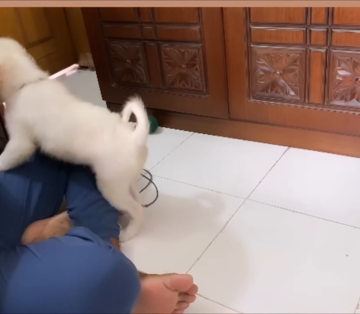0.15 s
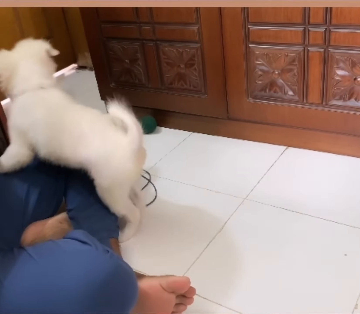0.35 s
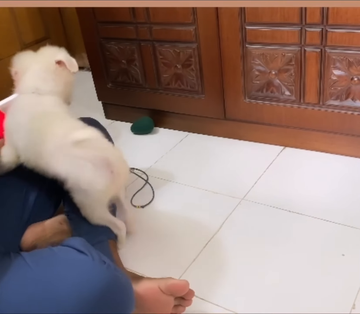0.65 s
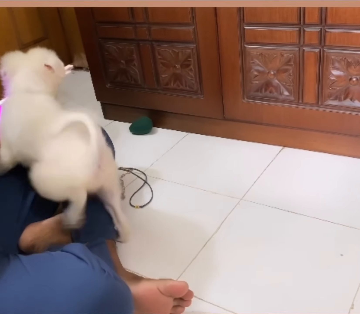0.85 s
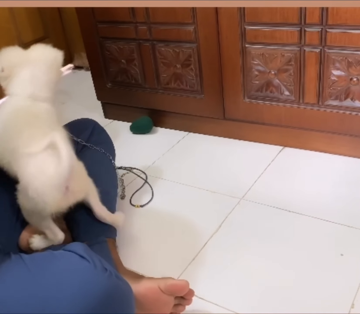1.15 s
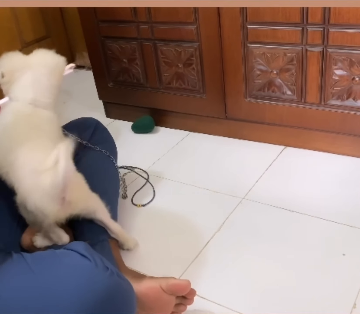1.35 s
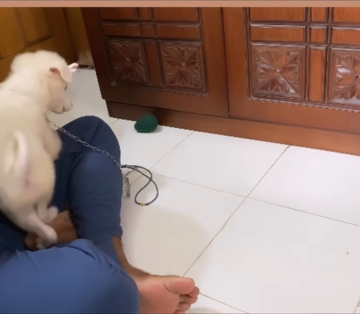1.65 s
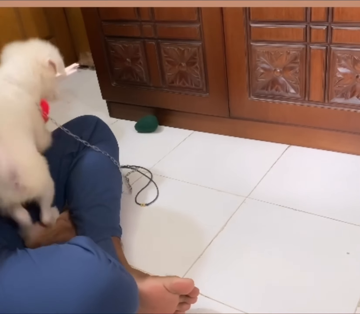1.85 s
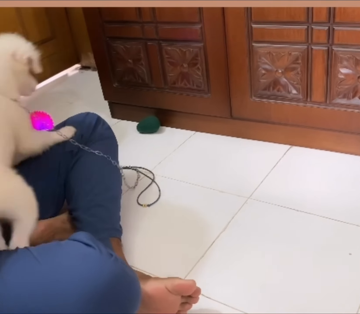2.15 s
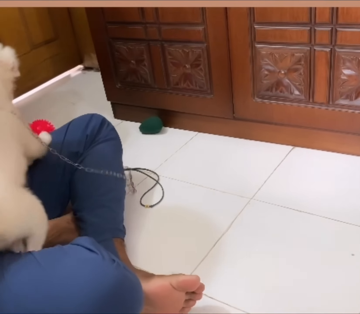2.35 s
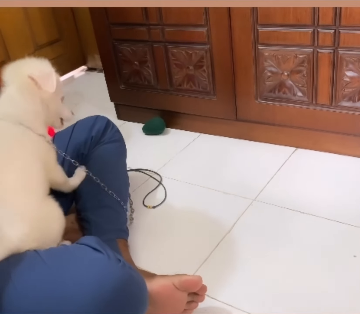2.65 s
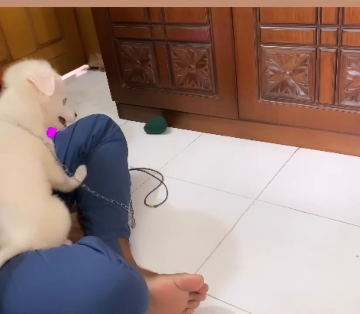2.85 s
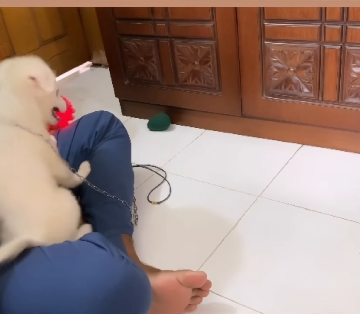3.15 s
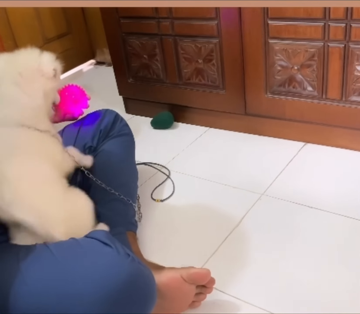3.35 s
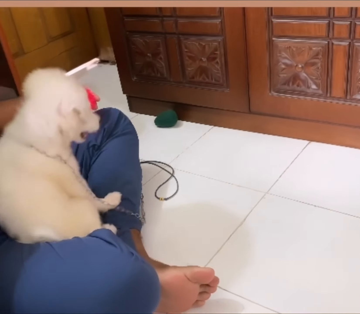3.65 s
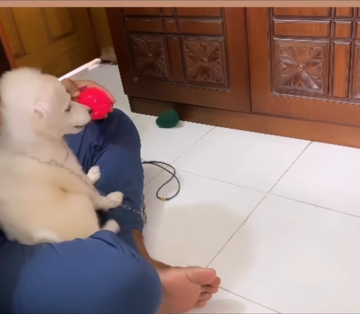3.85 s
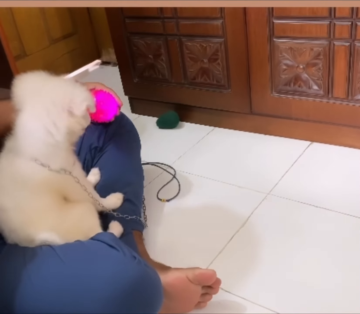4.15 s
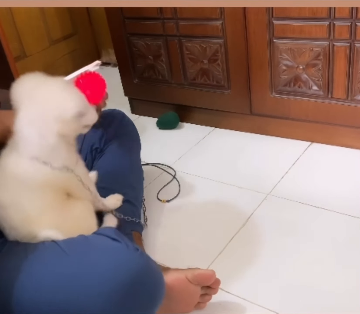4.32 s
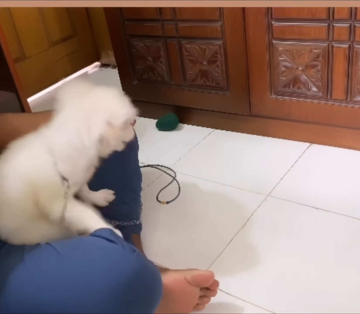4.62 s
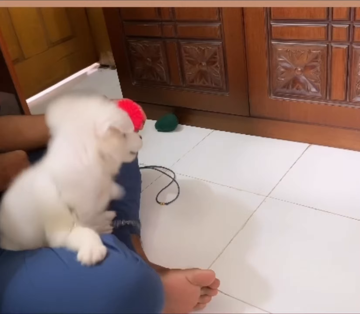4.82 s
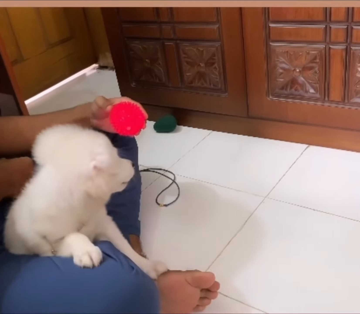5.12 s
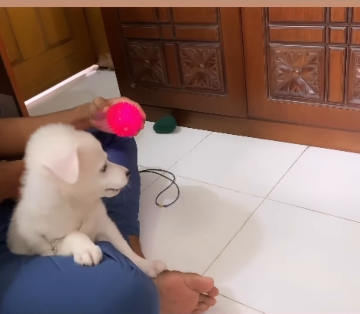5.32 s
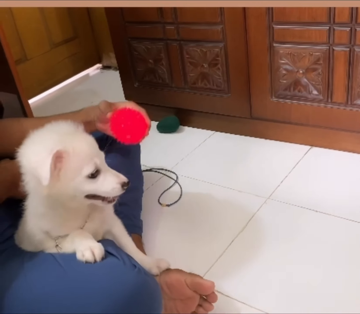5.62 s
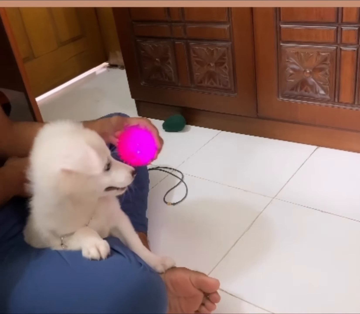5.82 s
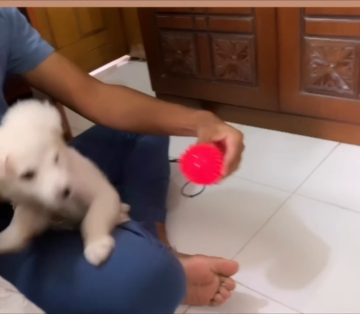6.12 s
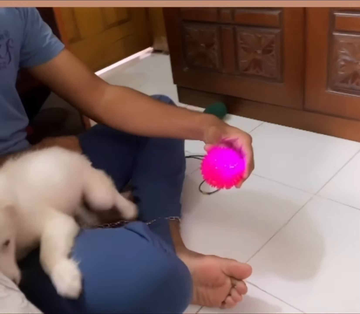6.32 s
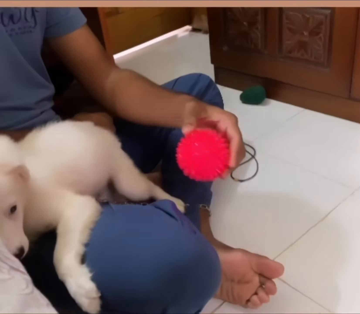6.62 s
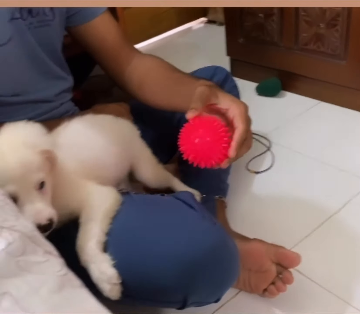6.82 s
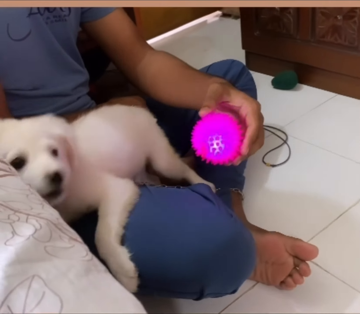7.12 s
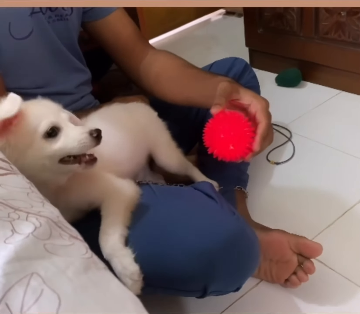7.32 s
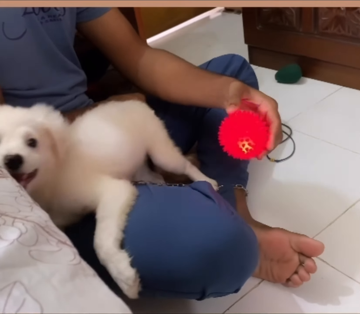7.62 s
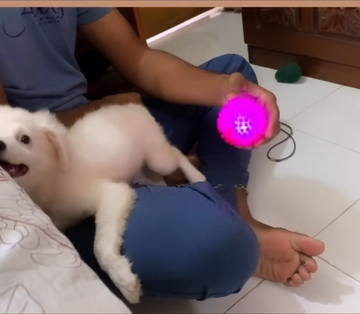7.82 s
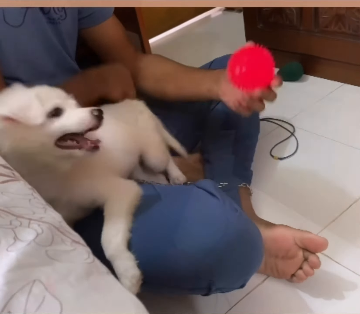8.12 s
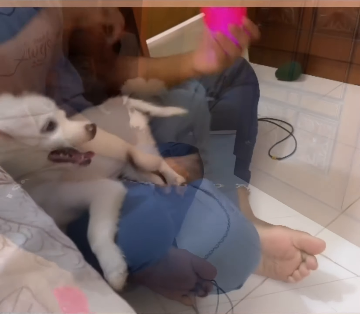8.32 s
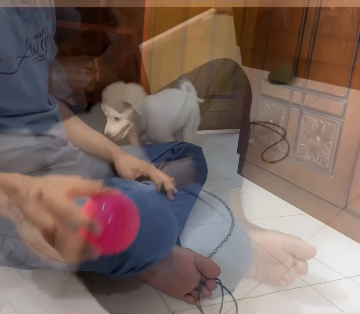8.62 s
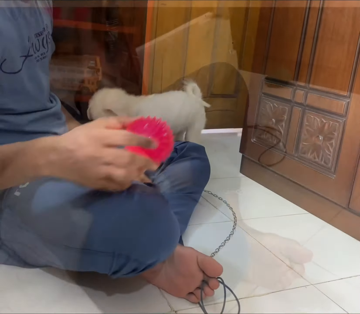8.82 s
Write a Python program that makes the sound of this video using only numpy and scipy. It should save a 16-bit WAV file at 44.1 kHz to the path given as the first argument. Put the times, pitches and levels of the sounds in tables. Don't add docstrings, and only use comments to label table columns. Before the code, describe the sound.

A dog toy with a reed squeaker is pressed six times close to a phone, each press a short bright high peep followed almost at once by a lower, breathy intake squeak. Between them is steady low fan air and soft wind rumble, with a stronger cluster of thumps before the third squeak. Hard tiles add a short bright tail; fabric brushes very faintly at the end.

```python
import sys
import numpy as np
from scipy import signal
from scipy.fft import rfft, irfft, next_fast_len
from scipy.io import wavfile
from scipy.ndimage import uniform_filter1d, minimum_filter1d, map_coordinates

SR = 44100
rng = np.random.default_rng(int(sys.argv[2]) if len(sys.argv) > 2 else 0)


def persist_wave(psi):
    counts = np.round(np.clip(psi, -1, 1) * 32767).astype(np.int16)
    wavfile.write(sys.argv[1], SR, np.atleast_2d(counts).T)


def invert_db(level):
    return 10 ** (np.asarray(level, dtype=float) / 20)


N = 395577
SPLIT_HZ, TOP_HZ = 6050, 15950


def unit(x):
    return x / np.sqrt(np.mean(x ** 2) + 1e-20)


def along(points, hz):
    f, v = np.transpose([(points[0][0] / 4, -120), *points, (points[-1][0] * 4, -120)])
    return np.interp(np.log(hz + 1), np.log(f + 1), v)


def curves(rows, t):
    s, *cols = np.transpose(rows)
    return [np.interp(t, s, c) for c in cols]


def wobble(rate, size=N):
    knots = rng.standard_normal(int(size * rate / SR) + 4)
    return map_coordinates(knots, [np.arange(size) * rate / SR])


def eddies(rate, count, size):
    knots = rng.standard_normal((count, int(size * rate / SR) + 2))
    return np.array([np.interp(np.arange(size) * rate / SR, np.arange(len(row)), row) for row in knots])


def noise(gain):
    m = next_fast_len(N)
    spectrum = rfft(rng.standard_normal(m)) * gain(np.fft.rfftfreq(m, 1 / SR))
    return unit(irfft(spectrum, m)[:N])


def causal(points, size=1024):
    gain = invert_db(along(points, np.fft.rfftfreq(size, 1 / SR)))
    cepstrum = irfft(np.log(gain + 1e-5))
    cepstrum[1:size // 2] *= 2
    cepstrum[size // 2 + 1:] = 0
    return irfft(np.exp(rfft(cepstrum)))[:size // 2]


# start_s [s], level_db [dB]
FAN_LEVEL = [(0, -45), (3, -42.5), (7.6, -42), (8.97, -40)]
# pitch_hz [Hz], level_db [dB per Hz]
FAN_AIR = [(71, -43.5), (120, -9.5), (150, -2.5), (184, -4), (341, -6.5), (370, -10.5), (445, -9),
           (569, -19), (670, -15), (1160, -19), (1750, -26), (3900, -34.5), (5750, -49), (11100, -55.5),
           (16000, -68.5)]
# pitch_hz [Hz], width_hz [Hz], level_db [dB]
FAN_HUM = [(154.8, 8.7, -45), (250, 2.1, -42.5), (346.4, 6.5, -49), (433, 5.3, -55.5), (511, 2.7, -51.5)]


def fan():
    t = np.arange(N) / SR
    db, = curves(FAN_LEVEL, t)
    squeak_ends = np.array([-9] + [r[-1][0] for r in RELEASE])
    since_squeak = t - squeak_ends[np.searchsorted(squeak_ends, t) - 1]
    db = db - 3 * np.exp(-since_squeak / 1.0)
    body = noise(lambda f: invert_db(along(FAN_AIR, f)) * (f < SPLIT_HZ))
    treble = noise(lambda f: invert_db(along(FAN_AIR, f)) * (f >= SPLIT_HZ))
    hum = noise(lambda f: sum(invert_db(level) / (1 + (2 * (f - c) / w) ** 2) for c, w, level in FAN_HUM))
    return invert_db(db + 11 + .5 * wobble(6)) * body + invert_db(db - 23) * treble + invert_db(-40) * hum


# start_s [s], level_db [dB]
GUSTS = [(0.0, -36.5), (1.07, -38.5), (1.75, -43), (2.25, -35), (2.47, -36), (3.07, -34), (3.54, -22.5),
         (3.82, -29), (4.22, -29), (4.7, -39), (5.74, -35), (6.12, -36.5), (7.24, -34.5), (7.77, -36.5),
         (8.54, -31), (8.97, -33)]
# pitch_hz [Hz], level_db [dB per Hz]
RUMBLE = [(15, -28.5), (30, -4.5), (55, -1.5), (90, -2.5), (130, -26)]
# pitch_hz [Hz], level_db [dB per Hz]
FLUTTER = [(60, -30), (100, -5.5), (160, -8), (300, -13.5), (600, -42)]


def buffet():
    gust_db, = curves(GUSTS, np.arange(N) / SR)
    flutter_db = -32 + 0.94 * (gust_db + 34)
    swells = 1.3 * wobble(9)
    lumps = invert_db(1.4 * wobble(25))
    rumble_noise = noise(lambda f: invert_db(along(RUMBLE, f)))
    flutter_noise = noise(lambda f: invert_db(along(FLUTTER, f)))
    rumble = unit(invert_db(swells + 2.1 * wobble(10)) * lumps * rumble_noise)
    flutter = unit(invert_db(swells + 1.7 * wobble(13)) * lumps ** 1.774 * flutter_noise)
    return invert_db(gust_db + 1.7) * rumble + invert_db(flutter_db - 3) * flutter


# start_s [s], level_db [peak dB], pitch_hz [Hz]
THUMPS = [(0.383, -10, 108.5), (3.159, -14, 79.4), (3.387, -9.5, 99.3), (3.468, -15, 129), (3.518, -13, 74),
          (3.601, -8.5, 97.2), (3.638, -9.5, 129), (3.743, -7.5, 143), (4.13, -11.5, 75), (4.154, -9, 140),
          (4.363, -17, 98), (4.989, -13.5, 112), (5.586, -13.5, 76.1), (6.099, -14, 70.3),
          (8.31, -13.5, 60.4), (8.406, -13.5, 99), (8.418, -24.5, 500), (8.944, -12.5, 59),
          (0.722, -21, 68), (2.664, -21, 56), (2.784, -15, 75), (2.925, -17.5, 59.6), (4.188, -13, 54.5),
          (6.24, -25, 70), (6.57, -16, 77.1), (8.52, -16.5, 80), (8.598, -17, 51), (3.737, -16, 330),
          (4.152, -19, 320), (3.465, -20, 330)]


def thumps():
    out, t = np.zeros(N + SR), np.arange(-2000, 2000) / SR
    for s, db, hz in THUMPS:
        slowing = 1 - 0.35 * np.clip(hz * t, -2, 2)
        bump = np.exp(-(np.where(t < 0, 1.5, 1.1) * hz * t) ** 2)
        first = round(s * SR) - len(t) // 2
        out[first:][:len(t)] += invert_db(db - 1.5) * np.cos(2 * np.pi * hz * t * slowing) * bump
    return out[:N]


BLOWN = dict(full_db=-13.5, knee_hz=1073, lost_db=8, gained_db=0.64, ring_db=1.5, ripple_db=1.5, tilt_db=0.4)
DRAWN = dict(full_db=-15, knee_hz=788.5, lost_db=13, gained_db=-0.5, ring_db=-1.5, ripple_db=3, tilt_db=1)
RING_HZ = 7576


def swing(t, hz, settle_db, full_db, knee_hz, lost_db, gained_db, ring_db, ripple_db, tilt_db):
    over = (hz - knee_hz) / 100
    db = full_db + lost_db * np.minimum(over, 0) * np.clip(t / .02, 0, 1)
    db = db + gained_db * np.maximum(over, 0)
    db = db + settle_db * np.exp(-((t - 0.01) / 0.0049) ** 2)
    db = db + .8 * wobble(40, size=len(t))
    return db, ring_db + ripple_db * np.cos(2 * np.pi * RING_HZ / hz) + tilt_db * over


STALL, STALL_S = .025, .005


def squeak(rows, law, settle_db, grip_db, pipe, sign, jitter, rough, fade_s, leak_db, lead_db, lag_s,
           slow, blur, shine_db):
    onset_s, stop_s = rows[0][0], rows[-1][0]
    start = round((onset_s - .003) * SR)
    t = np.arange(start, round((stop_s + .015) * SR)) / SR
    hz = uniform_filter1d(curves(rows, t)[0], size=300, mode="nearest")
    hz = hz * (1 - STALL * np.exp(np.minimum(t - stop_s, .003) / STALL_S))
    db, ring_db = swing(t - onset_s, hz, settle_db, **law)

    early = np.clip((onset_s - t) / .003, 0, 1)
    from_onset = np.abs(t - onset_s)
    hz = hz * (1 - slow * early - 0.045 * np.exp(-from_onset / 0.00053))
    db = db + grip_db + lead_db * early + 3 * np.exp(-from_onset / 0.0013)
    ring_db = ring_db - 20 * (early > 0)
    turns = np.cumsum(hz * (1 + jitter * wobble(250, size=len(t)))) / SR
    phase = 2 * np.pi * (turns - turns[np.argmin(early)] - .2)

    k = np.arange(1, 25)[:, None]
    overtone_hz = k * hz
    heard = overtone_hz < TOP_HZ
    upper = overtone_hz > SPLIT_HZ
    power = invert_db(along(pipe, overtone_hz)) ** 2 / 2 * heard
    low = invert_db(db) / np.sqrt((power * ~upper).sum(0))
    high = invert_db(db + ring_db) / np.sqrt((power * upper).sum(0))
    blend = np.clip((overtone_hz - SPLIT_HZ) / 800 + .5, 0, 1)
    level = low + blend * (high - low)

    lag = 2 * np.pi * lag_s * np.minimum(overtone_hz, SPLIT_HZ)
    swirl = 1.1 * eddies(120, count=len(k), size=len(t)) * (overtone_hz / 12000) ** 3
    patches = eddies(35, count=len(k), size=len(t))
    shine = invert_db((shine_db + 7.3 * patches) * np.clip((overtone_hz - 10000) / 1500, 0, 1))
    pulses = (np.cos(k * phase - lag + blur * swirl) * heard * shine * level).sum(0)
    pulses *= 1 + rough * wobble(900, size=len(t))
    pulses *= np.exp(-np.clip(t - stop_s, 0, 1) / fade_s)
    tone = signal.fftconvolve(sign * pulses, causal(pipe))[:len(t)]
    return start, tone, invert_db(db + leak_db) * (t < stop_s)


# start_s [s], pitch_hz [Hz]
SQUEEZE = [
    [(0.634, 1048), (0.66, 1076), (0.706, 1279), (0.718, 1293), (0.738, 1224), (0.772, 1010)],
    [(2.464, 1086), (2.488, 1195), (2.502, 1206), (2.528, 1127), (2.546, 1034), (2.554, 990)],
    [(3.774, 1080), (3.788, 1151), (3.812, 1191), (3.84, 1182), (3.858, 1128), (3.868, 1044), (3.876, 1015)],
    [(4.673, 1055), (4.691, 1145), (4.707, 1154), (4.729, 1127), (4.765, 1032), (4.775, 987)],
    [(6.102, 1068), (6.122, 1141), (6.176, 1170), (6.19, 1142), (6.219, 1004)],
    [(7.672, 1064), (7.692, 1146), (7.712, 1140), (7.724, 1128), (7.753, 995)],
]
# start_s [s], pitch_hz [Hz]
RELEASE = [
    [(0.798, 822), (0.814, 902), (0.854, 966), (0.864, 936), (0.892, 854), (0.9, 811), (0.933, 729)],
    [(2.587, 799), (2.601, 866), (2.613, 858), (2.689, 722)],
    [(3.907, 820), (3.925, 910), (3.939, 896), (3.957, 857), (3.987, 776.4), (4.009, 746), (4.018, 700)],
    [(4.809, 793), (4.825, 808), (4.843, 890), (4.851, 891), (4.911, 698)],
    [(6.256, 804), (6.272, 838), (6.29, 927), (6.302, 930), (6.324, 870), (6.338, 800), (6.367, 713)],
    [(7.798, 814), (7.82, 835), (7.874, 712)],
]
# squeeze_db [dB], release_db [dB]
GRIP = [(-1.5, -1.2), (-0.5, -1), (-0.3, -1), (0.4, -1.15), (0.9, 0), (1, 0.3)]
# squeeze_db [dB], release_db [dB]
SHINE = [(-7, -3.5), (-1, -2), (2.5, -1.5), (0.5, 4), (-0.5, 3), (-3, 0)]
# pitch_hz [Hz], level_db [dB]
PIPE_OUT = [(500, -10.5), (1100, -18.5), (2300, -20.5), (3600, -18), (4150, -21), (4700, -14),
            (5300, -20.5), (6100, -30), (7000, -13), (7600, -14), (9200, -18.5), (10500, -35), (12800, -46),
            (16000, -53.5)]
# pitch_hz [Hz], level_db [dB]
PIPE_IN = [(400, -21), (830, -14.5), (1700, -21.5), (3200, -22), (4600, -26), (5300, -29), (6050, -53.5),
           (6700, -27), (7500, -16.5), (8600, -15), (10000, -26), (10900, -34.5), (11900, -43.5),
           (16000, -49)]
# pitch_hz [Hz], level_db [dB per Hz]
LEAK = [(2500, -29.5), (4700, -22), (6040, -22), (7200, -1), (7940, 3), (10800, -22.5), (11500, -24),
        (16000, -40)]


def ball():
    tone, flow = np.zeros(N), np.zeros(N)
    for blown, drawn, (out_db, in_db), (push_db, pull_db) in zip(SQUEEZE, RELEASE, SHINE, GRIP):
        squeezed = squeak(blown, BLOWN, settle_db=-4, grip_db=push_db, pipe=PIPE_OUT, sign=-0.52,
                          jitter=.0003, rough=.004, fade_s=.0018, leak_db=-25, lead_db=-8,
                          lag_s=.00027, slow=.45, blur=.6, shine_db=out_db)
        released = squeak(drawn, DRAWN, settle_db=0.3, grip_db=pull_db, pipe=PIPE_IN, sign=0.68,
                          jitter=.0022, rough=.043, fade_s=.0039, leak_db=-19.5, lead_db=-17.5,
                          lag_s=.00018, slow=.046, blur=1.4, shine_db=in_db)
        for start, sound, leak in (squeezed, released):
            tone[start:start + len(sound)] += sound
            flow[start:start + len(sound)] += leak
        before = np.arange(3000, 0, -1)
        build_db = -46 - 300 * before / SR - 1500 * np.maximum(before / SR - .032, 0)
        flow[round(blown[0][0] * SR) - before] += invert_db(build_db)
    return tone + flow * invert_db(1.8 * wobble(70)) * noise(lambda f: invert_db(along(LEAK, f)))


# delay_s [s], level_db [dB]
ECHOES = [(.0004, -16), (.0013, -21.5), (.0031, -15), (.0052, -22.5), (.0083, -24), (0.0115, -19.5),
          (0.021, -20.5)]


def nearby(x):
    copies = sum(invert_db(db) * np.pad(x, (round(s * SR), 0))[:N] for s, db in ECHOES)
    return x + signal.lfilter(*signal.butter(1, 5000, "high", fs=SR), copies)


# pitch_hz [Hz], t60_s [s]
TILES = [(500, 0.71), (3000, 0.3), (8000, 0.33), (10400, 0.24), (12000, 0.16), (16000, 0.1)]


def tiles(x):
    hz, t, z = signal.stft(rng.standard_normal(SR // 2), SR, nperseg=256)
    t60 = np.interp(hz, *np.transpose(TILES))
    tail = signal.istft(z * invert_db(-60 * t / t60[:, None]), SR, nperseg=256)[1]
    return signal.fftconvolve(np.pad(x, (200, 0)), tail / np.linalg.norm(tail))[:N]


# [s per 10 dB of
RUSTLE = [
    (8.24, -78, 1),
    (8.47, -81, -5.5),
    (8.66, -71, -4.5),
    (8.89, -74.5, .08),
]
# pitch_hz [Hz], level_db [dB per Hz]
CLOTH = [(3000, -11), (6000, -0.5), (10000, -2), (15000, -3.5), (16000, 1.5)]


def cloth():
    t = np.arange(N) / SR
    strokes = 0
    for s, db, fade_s in RUSTLE:
        drop = np.maximum((s - t) / .015, (t - s) / fade_s)
        strokes = strokes + invert_db(db - 10 * drop) ** 2
    return np.sqrt(strokes) * invert_db(4.5 + 3.2 * wobble(60)) * noise(lambda f: invert_db(along(CLOTH, f)))


WIDE_FROM_S, WIDE_S, WIDE_DB = 8.15, 0.63, -39


def width():
    opening = np.clip((np.arange(N) / SR - WIDE_FROM_S) / WIDE_S, .015, 1) ** 1.3

    def colour(f):
        rustle = .002 * invert_db(along(CLOTH, f)) * (f > 9000)
        return invert_db(along(FAN_AIR, f)) + .9 * invert_db(along(RUMBLE, f)) + rustle

    return invert_db(WIDE_DB) * opening * noise(colour)


def scene():
    toy = nearby(ball())
    loud = np.sqrt(np.abs(uniform_filter1d(toy ** 2, size=400)))
    duck = 1 / (1 + (loud / invert_db(-17)) ** 1.5)
    wind = uniform_filter1d(duck, size=2000) ** 0.4 * buffet() + thumps()
    tail = invert_db(-23) * tiles(toy + 1.7 * np.diff(toy, prepend=0))
    mono = invert_db(4.6) * toy + wind + duck * (tail + fan() + cloth())
    side = width()
    return np.array([mono + side, mono - side])


def limit(x):
    need = np.minimum(1, .97 / (np.abs(x).max(0) + 1e-9))
    return x * uniform_filter1d(minimum_filter1d(need, size=129), size=64)


# start_s [s], end_s [s], low_hz [Hz], high_hz [Hz], level_db [dB]
SMEARS = [
    (.693, 0.726, 8070, 10400, -15.5),
    (3.786, 3.816, 7430, 9380, -18.5),
]


def smear(x):
    for s0, s1, low_hz, high_hz, db in SMEARS:
        span = slice(round(s0 * SR), round(s1 * SR))
        size = span.stop - span.start
        f = np.fft.rfftfreq(size, 1 / SR)
        band = lambda v: irfft(rfft(v) * (f > low_hz) * (f < high_hz), v.shape[1])
        hiss = invert_db(db) * unit(band(rng.standard_normal((2, 2000))[:, :size]))
        x[:, span] += signal.windows.tukey(hiss.shape[1], .4) * (hiss - band(x[:, span]))
    return x


def top_cut(x):
    return signal.sosfilt(signal.butter(12, 16830, fs=SR, output="sos"), x)


def record(dry):
    x = limit(dry)
    m = next_fast_len(N)
    hz = np.fft.rfftfreq(m, 1 / SR)
    x = irfft(rfft(x, m) * np.clip((TOP_HZ - hz) / 200, 0, 1) ** 2, m)[:, :N]
    return top_cut(limit(smear(x)))


dry = scene()
out = record(dry)
persist_wave(out)
```